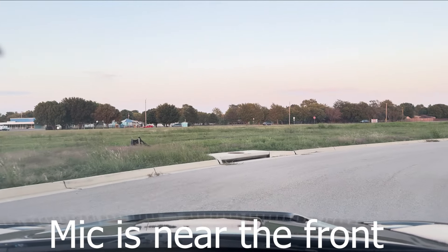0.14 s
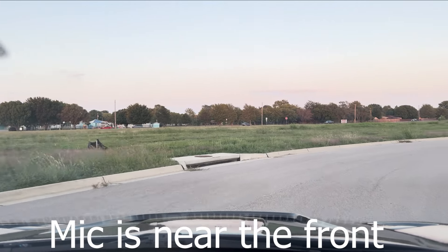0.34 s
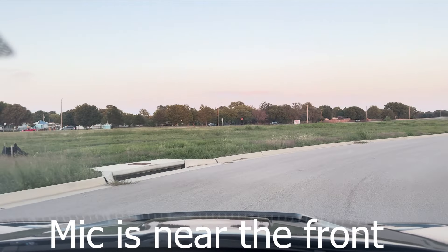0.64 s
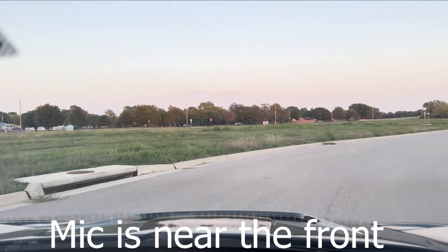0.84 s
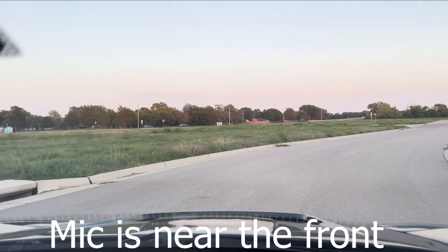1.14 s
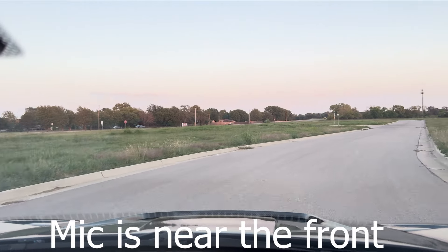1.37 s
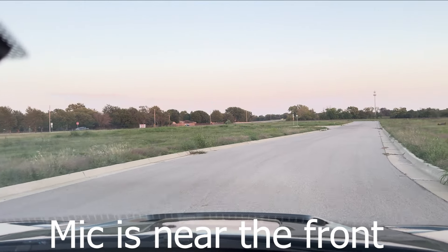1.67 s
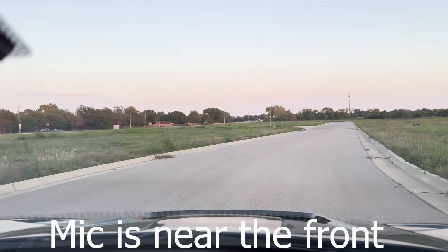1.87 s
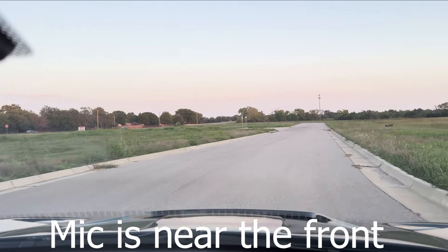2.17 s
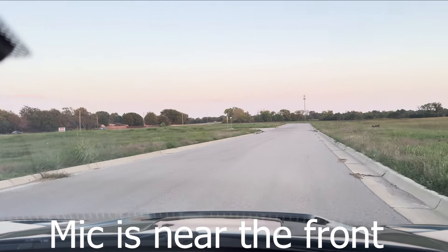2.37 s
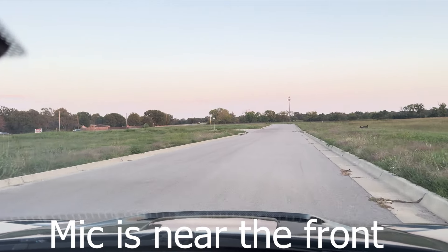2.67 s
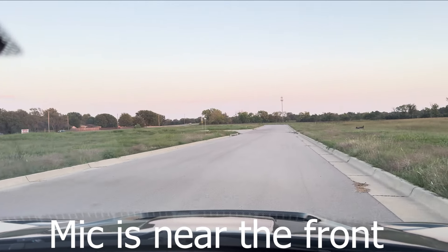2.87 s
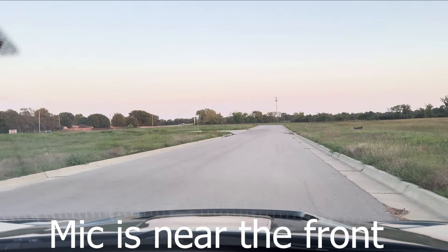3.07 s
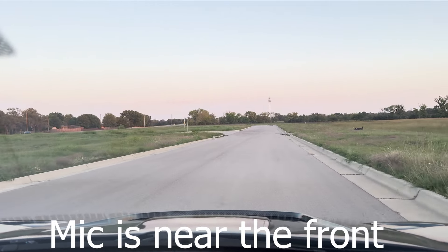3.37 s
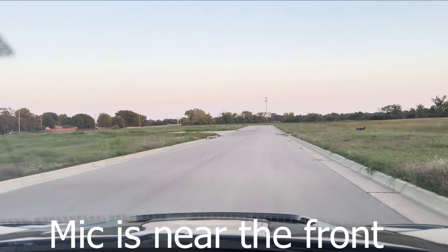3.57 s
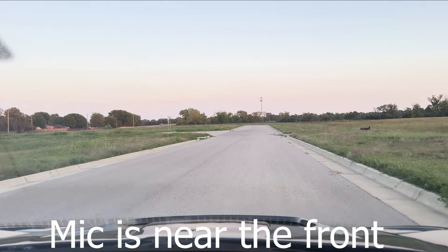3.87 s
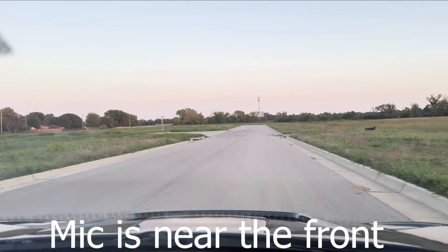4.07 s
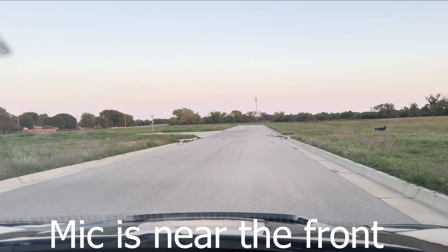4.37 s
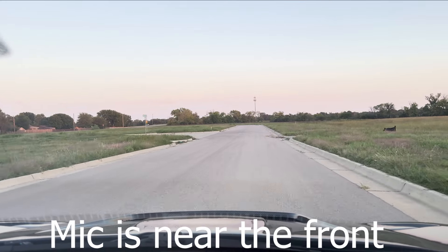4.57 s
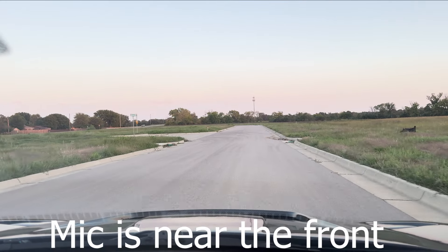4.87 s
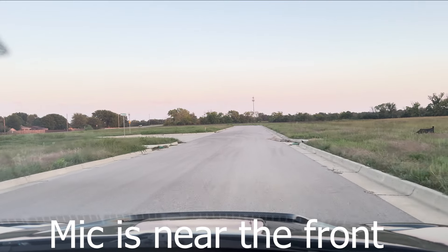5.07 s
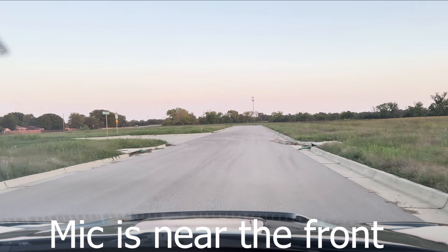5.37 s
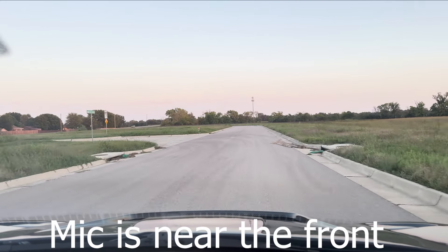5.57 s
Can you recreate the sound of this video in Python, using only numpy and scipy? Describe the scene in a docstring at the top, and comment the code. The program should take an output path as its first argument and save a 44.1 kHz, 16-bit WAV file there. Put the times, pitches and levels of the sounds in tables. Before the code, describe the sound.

A turbocharged four-cylinder car is heard from its nose on an open road, the microphone very close to the intake. From 0 to about 3.4 seconds it pulls through one gear: a deep, pulsing boom with uneven rasp rises steadily in pitch and grows fuller, with rushing intake air and fine metallic valve clatter. Turbo hiss swells from about 2.4 seconds and the loudest pulses distort the microphone. At about 3.5 seconds the throttle shuts; the boom drops away and around nine even, upward-chirping chuffs, roughly thirteen a second, flutter and fade by about 4.2 seconds over low gusty air, as the revs sag. A short clack at 4.45 seconds marks the gear change, the pitch drops, and the throttle reopens with a gulp of air. A fainter knock follows at 4.7. The engine pulls upward again, boom, rasp and hiss building until the end at 5.7 seconds.

```python
"""The intake of a turbocharged four-cylinder car booms and rasps as harmonics and pulses of its firing rate.
The car pulls up through a gear, lifts off, shifts with knocks and pulls again, heard from its nose.
Shaped noise makes the intake rush, the valve gear's clatter, the low wind and the turbo's hiss.
The turbo flutters in chirping bursts while the throttle is shut; the loudest pulses overload the microphone."""
import sys
import numpy as np
from scipy import signal
from scipy.fft import rfft, irfft
from scipy.io import wavfile

SR = 44100
rng = np.random.default_rng(int(sys.argv[2]) if len(sys.argv) > 2 else 0)


def materialize(psi):
    """Save the field psi as 16-bit PCM at rate SR to the path in sys.argv[1].

    A 1-D psi becomes a single channel; in a 2-D psi each row is a channel.
    """
    bounded = np.clip(np.atleast_2d(psi).T, -1, 1)
    quanta = np.round(bounded * 32767).astype(np.int16)
    wavfile.write(sys.argv[1], SR, quanta)


N = 252693
TIME = np.arange(N) / SR
BINS = np.fft.rfftfreq(N, 1 / SR)

# engine speed as cylinder firings per second: [t/s, f/Hz]
FIRING_RATE = [(0, 56.2), (.45, 60.7), (1.08, 66.08), (1.7, 72.83), (2.2, 79.3), (2.52, 87.55),
               (2.88, 95.04), (3.36, 107.8), (3.46, 105.3), (3.58, 105), (3.75, 102.4), (4.1, 94.46),
               (4.42, 89.8), (4.52, 74.84), (4.62, 79.8), (4.8, 83.14), (5.1, 84.2), (5.73, 96.74)]
# how hard the engine draws: [t/s, level/dB]; each layer takes its own share of it
ENGINE_LOAD = [(0, -2), (.35, 0.2), (.65, 5), (.95, 0.9), (1.55, -2.5), (1.75, 1.65), (2.25, 2.35),
               (2.4, -1), (2.8, -2.5), (3.35, 4), (3.6, 3), (3.75, -9), (4, 2), (4.45, -3.5), (4.6, 1.65),
               (5.73, 1)]
# the throttle shuts for the shift and opens again: start and duration (s)
LIFT_S, SHUTTING_S = 3.46, 0.097
REOPEN_S, OPENING_S = 4.49, 0.026


def gain_of(db):
    """Level to amplitude: 20 dB is a factor of ten."""
    return 10 ** (np.asarray(db) / 20)


def evened(x):
    """Normalization: scales a signal to rms 1."""
    return x / np.sqrt(np.mean(x ** 2) + 1e-20)


def curves(rows):
    """Linear interpolation in time of each column of a table."""
    s, *columns = np.transpose(rows)
    return [np.interp(TIME, s, c) for c in columns]


def read(points, hz):
    """Frequency response: the gain at given frequencies, its dB joined on a log-frequency axis."""
    f, db = np.transpose(points)
    return gain_of(np.interp(np.log(hz + 1), np.log(f + 1), db))


def coloured(x, points):
    """Linear filtering: multiplies the spectrum by a response, then scales to rms 1."""
    return evened(irfft(rfft(x) * read(points, BINS), N))


def noise():
    """White noise: equal mean power at all frequencies."""
    return rng.standard_normal(N)


def wander(hz):
    """Low-pass noise: random fluctuation up to about a given rate, at rms 1."""
    return evened(irfft(rfft(noise()) / (1 + (BINS / hz) ** 4), N))


def resonate(x, hz, width):
    """Damped resonance: a complex pole with a peak gain of about 1."""
    r = np.exp(-np.pi * width / SR)
    pole = r * np.exp(2j * np.pi * hz / SR)
    return 2 * signal.lfilter([1 - r], [1, -pole], x).real


def engine_bay(x, ring_s=.012, wet=.8):
    """Multiple reflection: close panels return dense short echoes that add ripple but no broad colour."""
    t = TIME[:SR // 10]
    envelope = np.exp(-t / ring_s) * (1 - np.exp(-t / ring_s))
    echoes = rng.standard_normal(len(t)) * envelope
    return x + wet * signal.oaconvolve(x, echoes / np.linalg.norm(echoes))[:N]


def ramp(start_s, length_s):
    """Linear transition from 0 to 1."""
    return np.clip((TIME - start_s) / length_s, 0, 1)


def shut():
    """Throttling: 0 with the throttle open, 1 with it shut."""
    return ramp(LIFT_S, SHUTTING_S) - ramp(REOPEN_S, OPENING_S)


def effort(mid_db, octave_db, load_share, shut_db, refill_db=0, mid_firing_hz=80, refill_s=0.46):
    """Power law of speed plus load, in dB; a shut throttle lowers it and the gulp on reopening raises it."""
    octaves = np.log2(curves(FIRING_RATE)[0] / mid_firing_hz)
    # the emptied manifold gulps air after the throttle opens
    refill = ramp(REOPEN_S, OPENING_S) * np.exp(-((TIME - REOPEN_S) / refill_s) ** 2)
    speed_db = mid_db + octave_db * octaves
    return speed_db + load_share * curves(ENGINE_LOAD)[0] + shut_db * shut() + refill_db * refill


def buffet(start_db=-45, climb_db_per_s=2.35, gust_db=2):
    """Turbulence: lumpy low air at the nose grows steadily, and gusts add power as the intake flow collapses."""
    # low air's relative spectrum: [f/Hz, level/dB]
    wind_spectrum = [(5, -6), (12, 1), (30, -4.5), (65, -6), (140, 0), (240, -4.5), (320, -14.5),
                     (600, -45), (2000, -72)]
    # gusts while the throttle is shut: [t/s, level/dB, rise/s, decay/s]
    gusts = [(3.57, -22, 0.044, 0.18), (4.27, -33, 0.069, 0.093)]
    power = gain_of(start_db + climb_db_per_s * TIME) ** 2
    for s, db, rise_s, decay_s in gusts:
        envelope = np.exp(np.minimum((TIME - s) / rise_s, (s - TIME) / decay_s))
        power = power + (gain_of(db) * envelope) ** 2
    lumps = gain_of(gust_db * wander(6.3))
    return np.sqrt(power) * lumps * coloured(noise(), wind_spectrum)


def knocks(decay_s=0.013, width_hz=250, tick_db=-1, rattle=1.0):
    """Impact and damped ringing: the next gear goes in with a clack, and the drive takes up its slack."""
    # gearbox knocks: [t/s, level/dB, ring f/Hz]
    impacts = [(4.449, -36.5, 1590), (4.698, -40.5, 1327)]
    # relative spectrum of the contact noise: [f/Hz, level/dB]
    tick_spectrum = [(800, -10), (1600, 9), (2100, 1.5), (3400, 4), (4500, -5), (8600, -7), (11000, -15),
                     (15000, -25)]
    out, tick = np.zeros(N), coloured(noise(), tick_spectrum)
    chatter = 1 + rattle * wander(width_hz)
    for s, db, hz in impacts:
        t = TIME - s
        ring = chatter * np.sin(2 * np.pi * hz * t)
        decay = (t >= 0) * np.exp(-abs(t) / decay_s)
        out += gain_of(db) * decay * (ring + gain_of(tick_db) * tick)
    return out


def flutter(count=9, delay_s=.02, every_s=.078, chuff_db=-31.5, fade_s=0.55, chuff_hz=1071,
            half_s=0.02, width_hz=150, rise_hz_per_s=3500, air_db=-9,
            bleed_db=-36, bleed_rise_s=0.12, bleed_fade_db_per_s=17):
    """Compressor surge: trapped air bleeds back through the compressor in even, fading, upward-chirping chuffs."""
    # relative spectrum of the escaping air: [f/Hz, level/dB]
    air_spectrum = [(700, -2), (820, 18), (1350, 15), (1560, 3), (1800, 10.5), (2000, -9), (2500, 3),
                    (3000, -7), (3950, 6.5), (5000, -12), (6500, -2.5), (9500, -14), (15000, -36)]
    air = coloured(noise(), air_spectrum)
    # a steady bleed swells up to the lift, then fades until the throttle reopens
    bleeding = ramp(LIFT_S - bleed_rise_s, bleed_rise_s) - ramp(REOPEN_S, OPENING_S)
    out = bleeding * gain_of(bleed_db - bleed_fade_db_per_s * (TIME - LIFT_S)) * air
    for age in every_s * np.arange(count):
        t = TIME - (LIFT_S + delay_s + age)
        # as it falls, the chuffs grow softer, purer and less chirped
        pressure = np.exp(-(age / fade_s) ** 2)
        jet = wander(width_hz * pressure) + 1j * wander(width_hz * pressure)
        jet = jet / np.sqrt(abs(jet))  # the duct holds the jet's strength fairly even
        cycles = (chuff_hz + pressure * rise_hz_per_s * t / 2) * t
        duct = evened((jet * np.exp(2j * np.pi * cycles)).real)
        burst = pressure * np.exp(-(t / half_s) ** 2)
        out += gain_of(chuff_db) * burst * (duct + pressure * gain_of(air_db) * air)
    return out


def turbo(firings, throb=0.094, flicker_db=1., swirl_hz=5200, climb_hz_per_db=60,
          swirl_width_hz=140, swirl_db=-8):
    """Flow noise: hiss throbs with the engine's draw; the narrow-band swirl off the blades follows boost in pitch."""
    # boost as the level of the hiss: [t/s, level/dB]
    boost = [(0, -55.5), (1.5, -57.5), (2.45, -49), (2.8, -44.5), (3.3, -41.5), (3.6, -49.5), (4.1, -63),
             (4.6, -53.5), (5.1, -47.5), (5.65, -39)]
    # relative spectrum of the hiss: [f/Hz, level/dB]
    hiss_spectrum = [(1500, -3), (3000, -12), (3900, 1), (4600, 1.5), (5200, -0.5), (5700, -7), (6700, -4),
                     (8300, -10.5), (9500, -18), (11500, -19.5), (13500, -37), (15700, -32)]
    boost_db = curves(boost)[0]
    draw = 1 - throb * np.cos(2 * np.pi * firings)
    air = noise() * draw * gain_of(flicker_db * wander(90))
    hiss = coloured(engine_bay(air, ring_s=0.0039, wet=0.68), hiss_spectrum)
    centre_hz = swirl_hz + climb_hz_per_db * (boost_db - boost_db.max())  # swirl_hz at greatest boost
    band = wander(swirl_width_hz) + 1j * wander(swirl_width_hz)
    swirl = band * np.exp(2j * np.pi * np.cumsum(centre_hz) / SR)
    return gain_of(boost_db) * (hiss + gain_of(swirl_db) * evened(swirl.real))


def clatter(firings, tick_firings=0.23, wash=0.91, ring_db=-7):
    """Modal excitation: valve and injector ticks, once a firing over chain and belt noise, ring the covers."""
    # relative spectrum of the direct clatter: [f/Hz, level/dB]
    clatter_spectrum = [(400, 9), (750, 2), (1130, 5), (1450, 0.5), (1750, 3), (2020, -2), (2350, 2.5),
                        (3000, 2.5), (3700, 2), (4800, -2), (5600, -9.5), (7800, -10), (9600, -17),
                        (12300, -12.5), (13500, -60), (15700, -58)]
    # ringing of the engine's covers: [f/Hz, width/Hz, relative level/dB]
    covers = [(930, 60, -3), (1152, 55, -1.5), (1700, 86, 1.5), (2195, 96, -1.5), (2490, 115, 2),
              (4305, 130, -4.5), (4696, 105, -1.5), (6740, 130, -14), (8820, 78, -14.5)]
    ticks = np.exp(-(firings % 1) / tick_firings)
    drive = engine_bay(noise() * (wash + ticks), ring_s=0.0026, wet=0.64)
    rings = sum(gain_of(db) * resonate(drive, hz, width) for hz, width, db in covers)
    level_db = effort(mid_db=-46.5, octave_db=6.5, load_share=.05, shut_db=-1.5)
    return gain_of(level_db) * (coloured(drive, clatter_spectrum) + gain_of(ring_db) * evened(rings))


def rush(firings, throb=0.057):
    """Amplitude-modulated turbulence: air tears through the intake in step with the strokes."""
    # relative spectrum of the rushing air: [f/Hz, level/dB]
    rush_spectrum = [(200, 14), (330, 2.5), (500, 7.5), (700, 2.5), (950, 5.5), (1250, -5.5), (1500, -9),
                     (1750, -3.5), (2100, -28), (5000, -66)]
    puffs = noise() * (1 - throb * np.cos(2 * np.pi * firings))
    level_db = effort(mid_db=-41.5, octave_db=30, load_share=0.063, shut_db=-8.0, refill_db=1)
    return gain_of(level_db) * coloured(puffs, rush_spectrum)


def rasp(firings, firing_hz, flare_hz=107, flare_width_hz=5, flare_db=2):
    """Impulse response: one sharp, uneven pulse a firing rings the pipes, and flares at the top of the revs."""
    # relative response of the pipes: [f/Hz, level/dB]
    pipe_response = [(150, -29), (240, -36), (290, -9), (345, -11), (400, -7.5), (470, 3), (525, 4),
                     (585, -9.5), (640, 3), (720, -18.5), (950, -6), (1300, -15), (2000, -25), (4000, -56)]
    # strength of each cylinder in firing order: [level/dB]
    cylinder_db = [1.5, -2, 3, -4]
    at = np.flatnonzero(np.diff(np.floor(firings + .5)))
    pulses = np.zeros(N)
    pulses[at] = gain_of(np.resize(cylinder_db, len(at)) + noise()[at])  # with 1 dB of chance
    level_db = effort(mid_db=-44.5, octave_db=14, load_share=1.1, shut_db=-6, refill_db=2.5)
    level_db = level_db + flare_db * np.exp(-((firing_hz - flare_hz) / flare_width_hz) ** 2)
    return gain_of(level_db) * coloured(engine_bay(pulses, ring_s=0.0038, wet=1.0), pipe_response)


def boom(firings, firing_hz, waver=0.033, shut_waver=0.15, uneven=0.062):
    """Forced resonance: the tract sets gain and phase of each harmonic of the once-a-firing intake stroke."""
    # gain of the tract before harmonic and load levels: [f/Hz, peak level/dB]
    tract_response = [(56, -34.5), (69, -35), (99, -15.5), (108, -20), (124, -29), (155, -20.5),
                      (188, -25.5), (212, -25), (228, -36), (275, -32.5), (340, -59), (430, -26)]
    # resonances that set the phase lag: [f/Hz, width/Hz]
    tract_modes = [(60, 16), (155, 25), (277, 200)]
    # first four multiples of the firing rate: [relative level/dB, change with the throttle shut/dB]
    harmonics = [(1.5, -12), (1, -3), (-0.5, -5.5), (-4, -35)]

    def lag(f):
        """Phase lag of driven resonators, summed over the modes."""
        return sum(np.arctan2(f * width, hz ** 2 - f ** 2) for hz, width in tract_modes)

    closed = shut()
    stroke = 2 * np.pi * firings + lag(firing_hz)  # so the first harmonic keeps step with the firings
    orders = 0
    for k, (db, shut_db) in enumerate(harmonics, 1):
        level = read(tract_response, k * firing_hz) * gain_of(db + shut_db * closed)
        unsteady = 1 + (waver + shut_waver * closed) * wander(15)
        orders = orders - level * unsteady * np.cos(k * stroke - lag(k * firing_hz))
    # the cylinders differ a little: patterns over two and four firings
    lope = np.cos(np.pi * firings) + wander(33) * np.cos(np.pi * firings / 2)
    return gain_of(curves(ENGINE_LOAD)[0]) * orders * (1 + uneven * lope)


def scene():
    """Superposition: one crankshaft times every engine sound, and all layers add."""
    firing_hz = curves(FIRING_RATE)[0] * (1 + .002 * wander(14))
    firings = np.cumsum(firing_hz) / SR  # running count
    engine = boom(firings, firing_hz) + rasp(firings, firing_hz) + rush(firings) + clatter(firings)
    return (engine + turbo(firings) + flutter() + knocks() + buffet())[None]


def record(dry, ceiling=0.17, coupling_hz=24, leak=0.056, edge_hz=15720):
    """Saturation: the microphone flattens peaks, its coupling tilts the flat tops, and a low-pass limits the band."""
    limited = dry / (1 + (dry / ceiling) ** 10) ** (1 / 10)
    overloaded = leak * dry + (1 - leak) * limited  # the leak keeps the tops from going quite flat
    tilted = signal.lfilter(*signal.butter(1, coupling_hz, "high", fs=SR), overloaded)
    tilted = tilted * signal.windows.tukey(N, .001)  # brief fades at both ends
    low_pass = signal.firwin(1023, edge_hz, window=("kaiser", 9), fs=SR)
    return signal.oaconvolve(tilted, low_pass[None], "same")


dry = scene()
out = record(dry)
materialize(out)
```